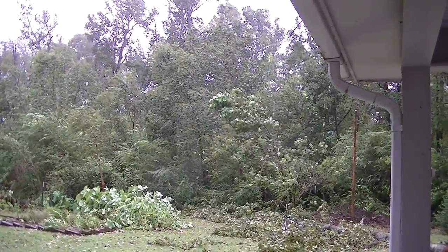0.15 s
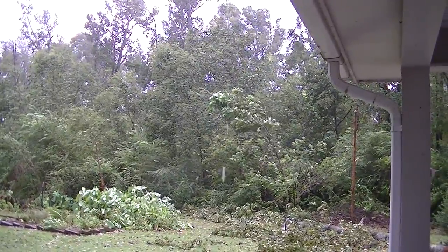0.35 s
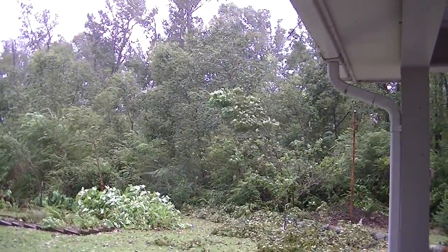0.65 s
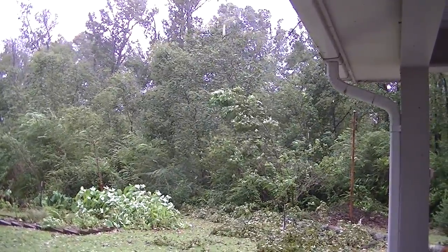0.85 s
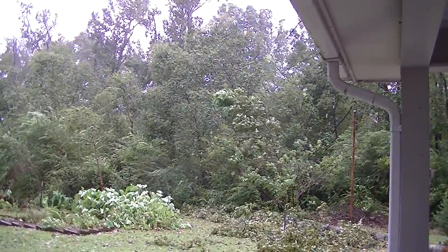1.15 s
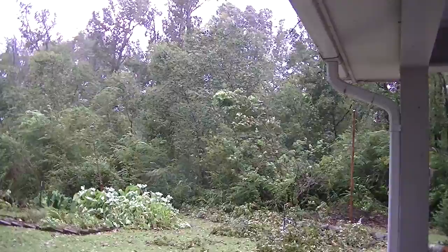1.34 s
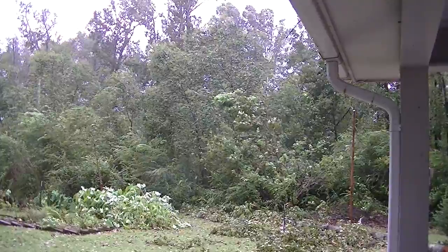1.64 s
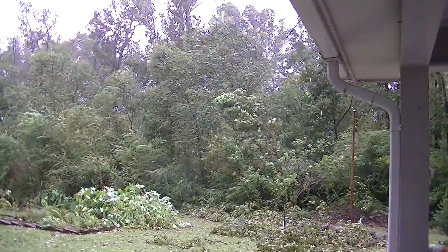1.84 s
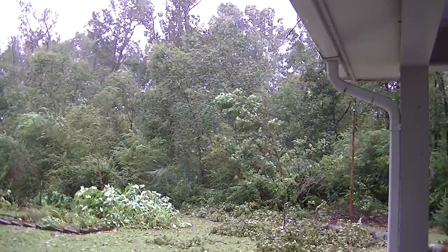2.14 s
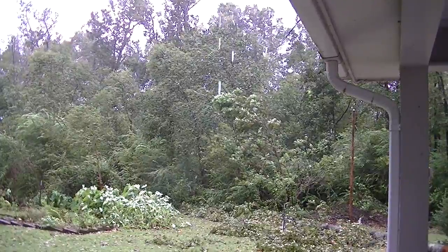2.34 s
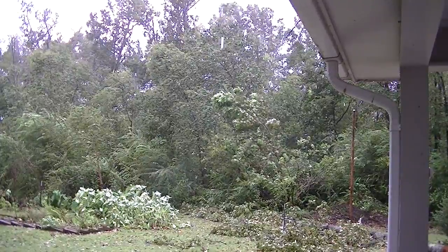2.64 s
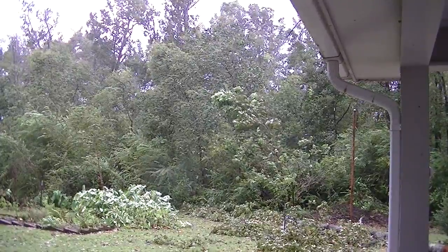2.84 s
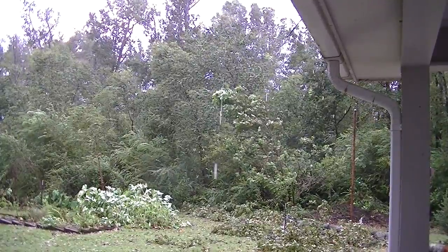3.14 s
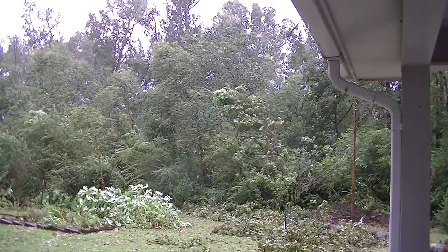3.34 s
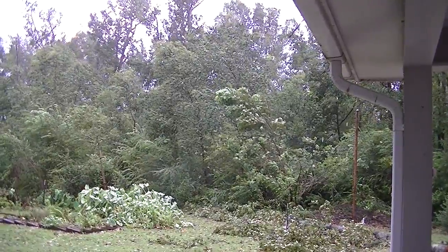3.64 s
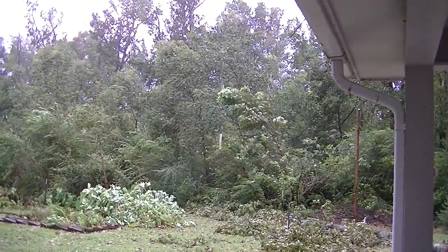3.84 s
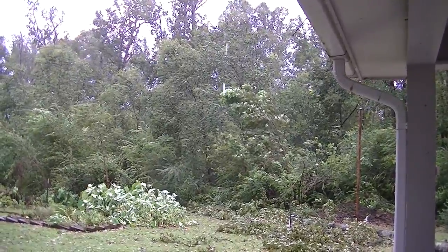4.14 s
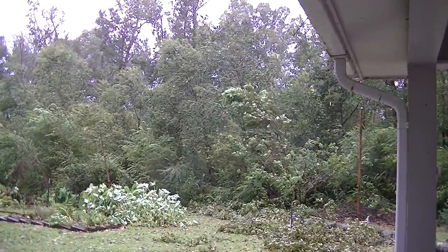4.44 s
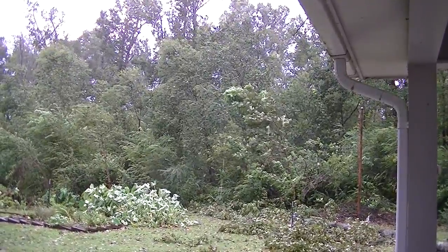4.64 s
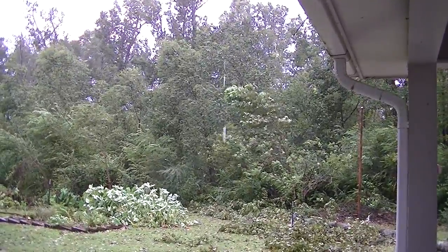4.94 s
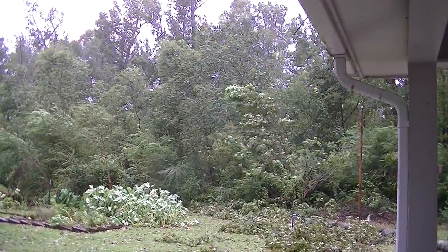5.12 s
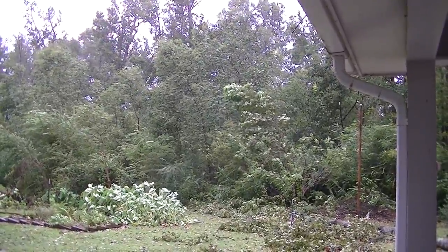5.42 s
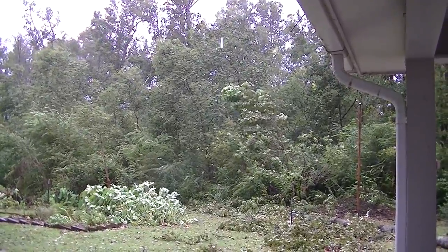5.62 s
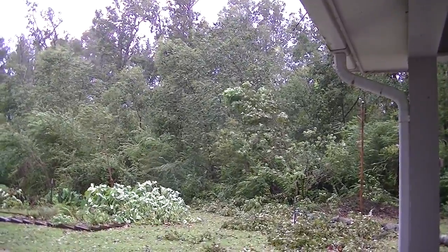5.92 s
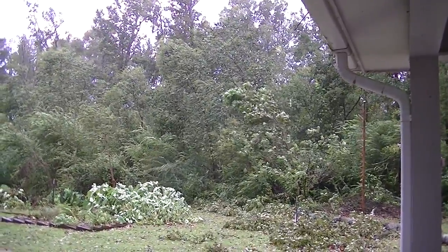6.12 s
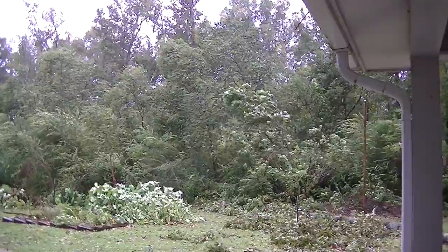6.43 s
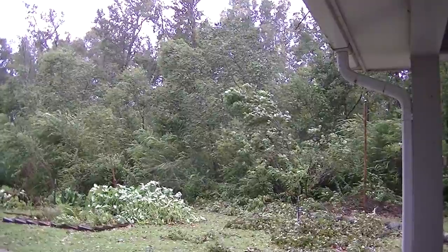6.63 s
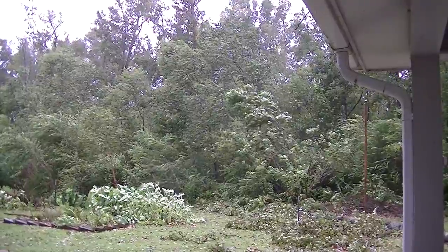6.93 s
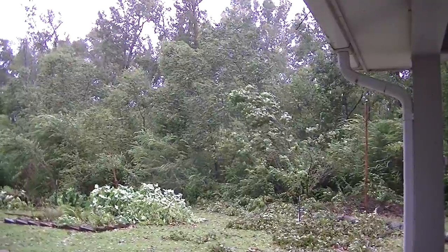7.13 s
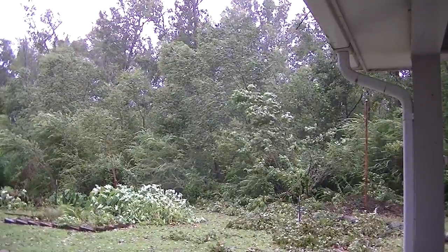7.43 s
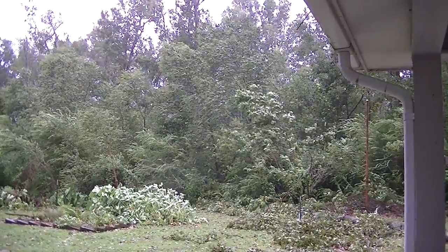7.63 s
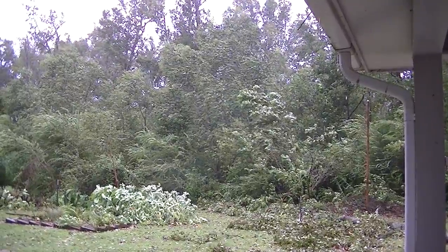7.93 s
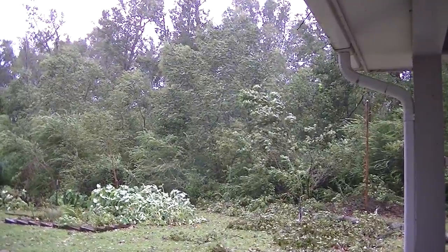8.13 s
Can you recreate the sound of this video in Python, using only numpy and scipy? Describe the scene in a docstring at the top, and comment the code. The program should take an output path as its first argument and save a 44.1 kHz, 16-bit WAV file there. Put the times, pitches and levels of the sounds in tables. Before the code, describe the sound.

Strong wind roars through thrashing trees and heavy rain hisses steadily, with roof drips smacking close by under a porch, slowly building louder.

```python
"""Wind roars through a wood, leaves thrash and heavy rain hisses, heard from under a porch roof: shaped noise
and tiny random impacts, all driven by one gust curve. An early gust fades, a stronger one builds to the end.
Drops from the eaves smack close by as short swelling tones with spray, each answered by the porch wall.
One very sharp drop beside the microphone makes the recorder's gain control duck. The sound is mono."""
import sys
import numpy as np
from scipy import signal
from scipy.fft import rfft, irfft, next_fast_len
from scipy.io import wavfile
from scipy.ndimage import uniform_filter1d, minimum_filter1d, map_coordinates

SR = 44100
rng = np.random.default_rng(int(sys.argv[2]) if len(sys.argv) > 2 else 0)


def store_wav(level_fs):
    """Save 16-bit WAV to argv[1]."""
    pcm = np.round(np.clip(np.atleast_2d(level_fs), -1, 1) * 32767)
    wavfile.write(sys.argv[1], SR, pcm.T.astype(np.int16))


N = 364707  # length in samples


def wind(level_db):
    """Distant crowns roar together; so many trees even out the gusts."""
    # roar of the crowns: f/Hz, level/dB per Hz
    roar_spectrum = [(25, -26), (50, -32), (100, -19.5), (150, -14), (200, -8.5), (320, -2.5), (600, 1),
                     (950, 0), (1500, -6.5), (3000, -29), (8000, -70)]
    roar = coloured(eddies(patchy_db=0.3), roar_spectrum)
    return amp(level_db + 0.15 * wobble(2.98)) * roar


def leaves(level_db):
    """Leaves rub in a rush and slap together in countless small ticks."""
    # thrashing leaves: f/Hz, level/dB per Hz
    leaf_spectrum = [(200, -58), (600, -11.5), (1000, -2.5), (1600, 0), (2400, -1), (3300, -2),
                     (4500, -4.5), (6500, -11.5), (10000, -32.5), (16000, -45)]
    rush = eddies(patchy_db=0.62)
    slaps = amp(-4.5) * impacts(rate=2500, spread_db=3.5)
    return amp(level_db + 0.26 * wobble(7)) * coloured(rush + slaps, leaf_spectrum)


def rain(level_db):
    """Far rain merges into hiss; nearer drops crackle on the lawn in flurries."""
    # rain spray: f/Hz, level/dB per Hz
    rain_spectrum = [(800, -50), (2500, -11.5), (4500, 0), (6000, 0), (7500, -1.5), (10000, -3),
                     (12500, -8.5), (15800, -19)]
    # harder rain means more drops rather than bigger ones, so the gust is smoother
    density = amp(level_db - level_db.min()) ** 2
    flurries = amp(1.8 * wobble(18))
    patter = flurries * impacts(rate=1500 * density, spread_db=5.0)
    hiss = eddies(patchy_db=0.6)
    return amp(level_db + 0.19 * wobble(12)) * coloured(hiss + amp(-6) * patter, rain_spectrum)


def gust_strength():
    """Wind strength in dB over the steady storm: each gust swells and fades as one smooth hump."""
    # gusts: t/s at the crest, rise/s from calm to crest, strength/dB
    gusts = [(0.4, 1.6, 0.7), (8.5, 4.0, 6.5)]
    t = np.arange(N) / SR
    strength_db = np.zeros(N)
    for crest, rise, db in gusts:
        phase = np.clip((t - crest) / rise, -1, 1)
        strength_db += db * np.cos(np.pi / 2 * phase) ** 2
    return strength_db


def eaves(wall_delay=.0033, wall_db=-10):
    """Drops land below the roof edge; the porch wall repeats each smack wall_delay seconds later."""
    # heavy drips, levels before the drop's band filter and the echoes:
    # t/s, level/dB, f/Hz, ring level/dB relative to the smack
    heavy_drips = [(.5376, -8, 3800, -16), (0.8547, -5, 2250, -24), (1.2476, -10, 1820, -16),
                   (2.6235, -13, 4600, -8), (3.137, -4.5, 1840, -8), (3.2492, -13, 1820, -18),
                   (3.549, -8, 1960, -3.5), (3.923, -9.5, 1300, -18), (4.2667, -6.5, 1680, -22),
                   (4.327, -11, 5800, -16), (4.6003, -6.7, 1500, -22), (5.3748, -10.5, 1680, -18),
                   (5.7356, -8, 1740, -16), (5.7955, -10, 1890, -20)]
    # fine droplets blown onto the porch, levels likewise: t/s, level/dB
    fine_droplets = [(.6006, -13), (1.1158, -15), (2.1591, -11), (2.4321, -14), (4.4229, -11),
                     (4.7977, -11), (5.1123, -14)]
    rise_cycles = 0.9  # a smack swells for this many cycles, so big, low drops last longer
    droplet_hz, droplet_rise_ms = 12000, 0.09  # all are about the same size

    plops = stray_drops(count=60, level_db=-18.0, spread_db=4.5, middle_hz=3100, octaves=1.1)
    ticks = stray_drops(count=70, level_db=-21.5, spread_db=5.5, middle_hz=10500, octaves=0.5)
    direct = plops + ticks
    for s, db, hz, ring_db in heavy_drips:
        rise_ms = 1000 * rise_cycles / hz
        smack = drop(db, hz, rise_ms, splash_db=-22, splash_t60=.02)
        add(direct, s, smack + ring(db + ring_db))
    for s, db in fine_droplets:
        add(direct, s, drop(db, droplet_hz, droplet_rise_ms, splash_db=-13, splash_t60=.015))

    # the roof and floor scatter a short, weak tail
    t = np.arange(SR // 8) / SR
    tail = rng.standard_normal(len(t)) * np.exp(-np.log(1000) * t / 0.07)
    porch = amp(-8.5) * signal.fftconvolve(direct, tail / np.linalg.norm(tail))[:N]
    # a linear phase is a pure delay
    wall = amp(wall_db) * filtered(direct, lambda hz: np.exp(-2j * np.pi * hz * wall_delay))
    return direct + wall + porch


def close_hit():
    """A drop lands right beside the microphone: a hard, dry tick with no porch echo."""
    # the close drop, level before the drop's band filter: t/s, level/dB, f/Hz, rise/ms
    close_drop = (6.8852, 3.9, 5100, 0.13)
    track = np.zeros(N)
    s, db, hz, rise_ms = close_drop
    add(track, s, drop(db, hz, rise_ms, splash_db=-30, splash_t60=.004))
    return track


def drop(db, hz, rise_ms, splash_db, splash_t60):
    """A drop's smack: a brief tone that swells and dies, with a little noisy spray."""
    t = np.arange(SR // 25) / SR
    u = t * 1000 / rise_ms  # time in rises: the swell peaks at 1
    swell = u ** 2 * np.exp(2 - 2 * u)
    smack = swell * np.sin(2 * np.pi * (hz * t + rng.random()))
    spray = rng.standard_normal(len(t)) * (1 - np.exp(-u)) * np.exp(-np.log(1000) * t / splash_t60)
    # so small a source radiates no bass, and the wet contact softens the very top
    band = signal.butter(2, [650, 13500], "bandpass", fs=SR, output="sos")
    return amp(db) * signal.sosfilt(band, smack + amp(splash_db) * spray)


def ring(db, hz=4130, t60=0.01):
    """The hard surface under the drips rings on a brief note, down 60 dB in t60 seconds."""
    t = np.arange(SR // 25) / SR
    onset = 1 - np.exp(-hz * t)
    decay = np.exp(-np.log(1000) * t / t60)
    return amp(db) * np.cos(2 * np.pi * hz * t) * onset * decay


def stray_drops(count, level_db, spread_db, middle_hz, octaves, rise_cycles=1):
    """Fainter drops land all round the porch at random; the higher their pitch, the shorter they are."""
    track = np.zeros(N)
    for when, size, pitch in rng.random((count, 3)):
        hz = min(middle_hz * 2 ** (octaves * (2 * pitch - 1)), SR / 3)
        db = level_db + spread_db * (2 * size - 1)
        rise_ms = 1000 * rise_cycles / hz
        add(track, when * (N - 1) / SR, drop(db, hz, rise_ms, splash_db=-18, splash_t60=.015))
    return track


def spatter(level_db=-47, life=.002):
    """Wind-blown droplets burst on the porch in noise prickles that decay with time constant life (s)."""
    # droplets bursting nearby: f/Hz, level/dB per Hz
    spray_spectrum = [(1200, -30), (3000, -1), (7000, -2), (11000, 0), (14000, -2), (15800, -7)]
    bursts = np.abs(impacts(rate=45, spread_db=3.5))
    envelope = signal.lfilter([1], [1, -np.exp(-1 / (life * SR))], bursts)
    return amp(level_db) * coloured(envelope * rng.standard_normal(N), spray_spectrum)


def eddies(patchy_db):
    """White noise with patches of random gain: boughs catch the wind one after another."""
    z = signal.stft(rng.standard_normal(N), nperseg=512)[2]
    field = uniform_filter1d(rng.standard_normal(z.shape), size=9, axis=0)  # smooth over frequency
    field = uniform_filter1d(field, size=24, axis=1)  # and over time
    patchy = z * amp(patchy_db * unit(field))
    return unit(signal.istft(patchy, nperseg=512)[1][:N])


def impacts(rate, spread_db):
    """Tiny impacts at random moments, rate a second (steady or changing), of log-normal sizes; even rms 1."""
    hit = rng.random(N) < rate / SR
    size = amp(spread_db * np.clip(rng.standard_normal(N), -2.5, 2.5))
    sign = rng.choice([-1, 1], N)
    return unit(hit * size * sign / np.sqrt(rate))


def amp(db):
    """Decibels to gain."""
    return 10 ** (np.asarray(db) / 20)


def unit(x):
    """Scale to rms 1."""
    return x / np.sqrt(np.mean(x ** 2) + 1e-20)


def wobble(rate):
    """A smooth random curve, rate knots a second."""
    knots = rng.standard_normal(int(N * rate / SR) + 4)
    return map_coordinates(knots, [np.arange(N) * rate / SR])


def filtered(x, response):
    """Multiply the spectrum of x by a response of frequency."""
    m = next_fast_len(N + 8192)
    return irfft(rfft(x, m) * response(np.fft.rfftfreq(m, 1 / SR)), m)[..., :N]


def coloured(x, spectrum):
    """Shape x by a spectrum of (Hz, dB) points, joined over log frequency, and scale to rms 1."""
    f, db = np.transpose(spectrum)
    return unit(filtered(x, lambda hz: amp(np.interp(np.log(hz + 1), np.log(f), db))))


def add(track, s, sound):
    """Mix a sound into the track at s seconds."""
    part = track[round(s * SR):][:len(sound)]
    part += sound[:len(part)]


def scene():
    """One wind strength drives roar, leaves and rain; all sources reach both channels alike."""
    gust_db = gust_strength()
    # each layer: level between gusts (dB) + dB gained for each dB of gust
    roar = wind(-31.1 + 0.7 * gust_db)
    thrash = leaves(-27.0 + 1.03 * gust_db)
    downpour = rain(-32.9 + 1.47 * gust_db)
    storm = roar + thrash + downpour
    mono = storm + spatter() + eaves() + close_hit()
    return np.array([mono, mono])


def gain_control(x, hold=.02, recovery_db=42):
    """A peak over the ceiling cuts the gain at once; it holds (s), then climbs recovery_db a second."""
    ceiling = .88
    needed_db = -20 * np.log10(np.maximum(np.abs(x).max(axis=0) / ceiling, 1))
    half = max(int(hold * SR / 2), 1)
    held_db = minimum_filter1d(needed_db, 2 * half + 1, origin=half)  # looks only backwards
    climb_db = abs(recovery_db) * np.arange(N) / SR
    gain_db = np.minimum.accumulate(held_db - climb_db) + climb_db
    return x * amp(gain_db)


def record(dry):
    """The recorder's gain control, then its low cut and a steep band limit."""
    low_cut_hz, top_hz = 110, 15850

    def response(hz):
        low_cut = hz ** 2 / np.hypot(hz ** 2, low_cut_hz ** 2)
        return low_cut * (hz < top_hz)

    return filtered(gain_control(dry), response)


dry = scene()
out = record(dry)
store_wav(out)
```